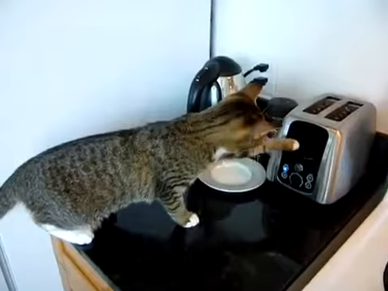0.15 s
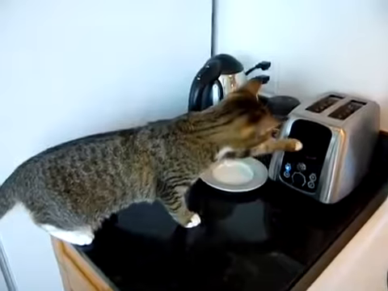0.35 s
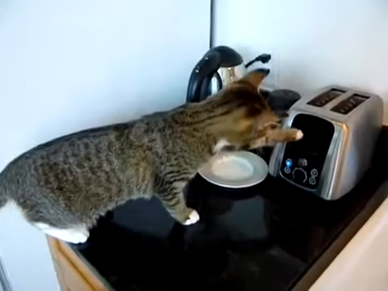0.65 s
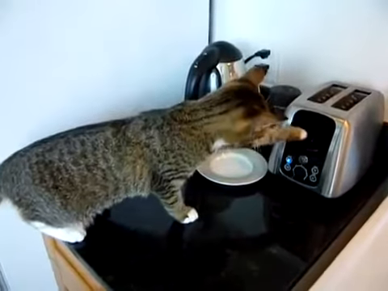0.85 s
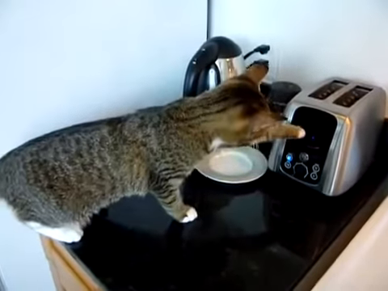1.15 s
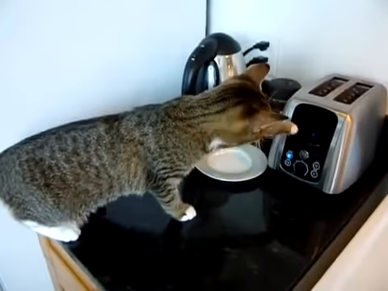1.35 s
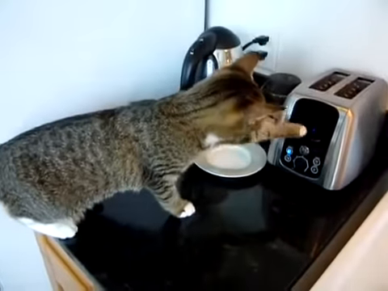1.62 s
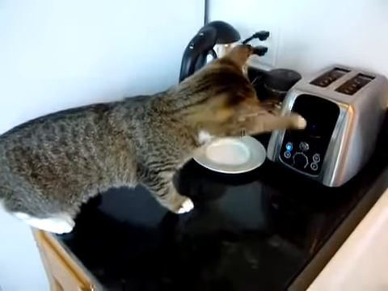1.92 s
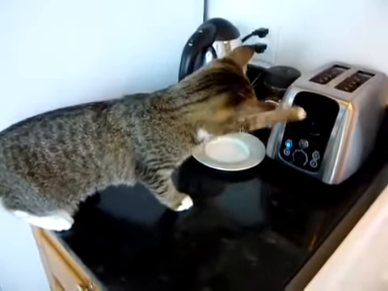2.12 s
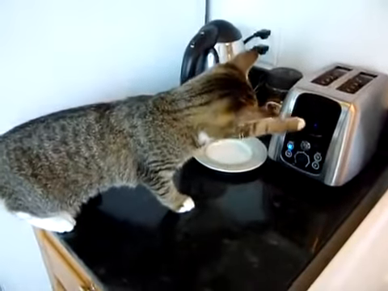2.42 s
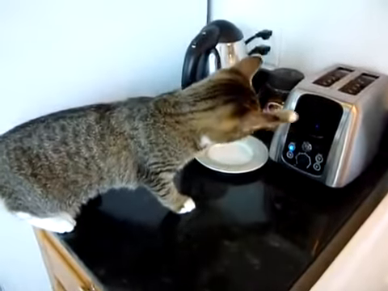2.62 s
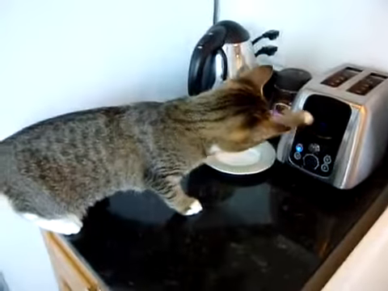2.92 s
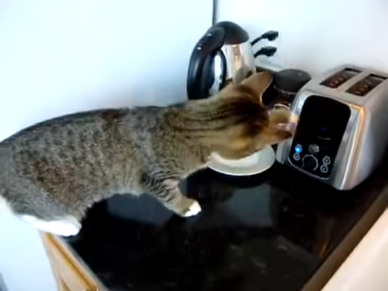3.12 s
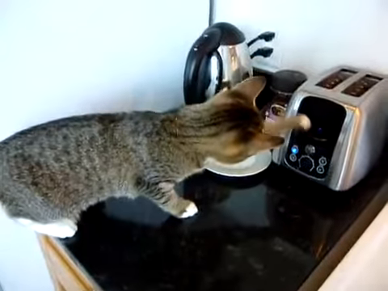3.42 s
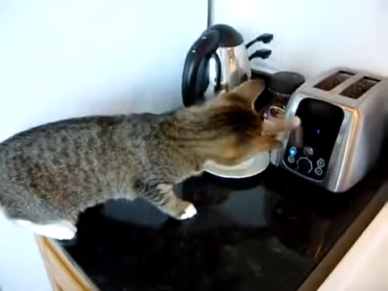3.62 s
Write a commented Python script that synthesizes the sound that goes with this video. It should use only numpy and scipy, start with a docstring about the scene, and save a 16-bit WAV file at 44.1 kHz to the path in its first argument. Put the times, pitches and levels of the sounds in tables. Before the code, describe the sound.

A toaster pops up loudly near the end, clacking, rattling and twanging in metal, after several seconds of quiet appliance drone with faint claw ticks and paw brushes; small kitchen, close microphone, dulled top end.

```python
"""An appliance drones, hums and softly bumps in a small kitchen while a cat paws at a toaster, claws ticking.
The catch lets go with a clack, the spring twangs downwards, the carriage rattles up its guides
and slams into the top stop; the steel case rings and knocks on the worktop.
Drone, fur and claws are shaped noise, the hum and spring are gliding sines,
and the metal is built from decaying sine modes and bursts of coloured noise."""
import sys
import numpy as np
from scipy import signal
from scipy.fft import rfft, irfft, next_fast_len
from scipy.io import wavfile

SR = 44100
rng = np.random.default_rng(int(sys.argv[2]) if len(sys.argv) > 2 else 0)


def master(y):
    """Save y as 16-bit WAV."""
    cut = np.clip(np.atleast_2d(y).T, -1, 1)
    pcm = np.round(cut * 32767)  # scale
    wavfile.write(sys.argv[1], SR, pcm.astype(np.int16))


N = 165816
TIME = np.arange(N) / SR
CONTACT_RISE_S = 0.0013  # attack shared by most of the metal parts


def from_db(db):
    """Decibels to gain."""
    return 10 ** (np.asarray(db) / 20)


def rms_one(x):
    """Scale to an rms of one."""
    return x / np.sqrt(np.mean(x ** 2) + 1e-20)


def noise(gain_at):
    """Noise of rms one whose gain is a function of frequency."""
    size = next_fast_len(N)
    hz = np.maximum(np.arange(size // 2 + 1) * SR / size, 1)
    spectrum = rfft(rng.standard_normal(size)) * gain_at(hz)
    return rms_one(irfft(spectrum, size)[:N])


def coloured(points):
    """Noise of rms one whose spectrum runs through (f/Hz, level/dB) points on a log frequency axis."""
    at, db = np.transpose(points)
    return noise(lambda hz: from_db(np.interp(np.log(hz), np.log(at), db)))


def octave_band(centre, spread):
    """Noise of rms one in a bell-shaped band, its spread in octaves."""
    return noise(lambda hz: np.exp(-.5 * (np.log2(hz / centre) / spread) ** 2))


def resonances(rows):
    """Noise through narrow resonances: unsteady tones."""
    out = np.zeros(N)
    for centre, width, db in rows:
        out += from_db(db) * noise(lambda hz: 1 / (1 + ((hz - centre) / width * 2) ** 2))
    return out


def drift(rate):
    """Slow random movement of rms one, fading out above the rate in Hz."""
    return noise(lambda hz: 1 / (1 + (hz / rate) ** 2))


def swell(middle, length):
    """Smooth bell-shaped envelope with a peak of one."""
    return np.exp(-2 * ((TIME - middle) / length) ** 2)


def swells(rows):
    """Sum of smooth swells from rows of (middle t/s, length/s, level/dB)."""
    return sum(from_db(db) * swell(middle, length) for middle, length, db in rows)


def blow(start, rise, t60):
    """Envelope of a quick rise and an exponential decay."""
    age = np.maximum(TIME - start, 0)
    return (1 - np.exp(-age / rise)) * from_db(-60 * age / t60)


def struck(modes, start, db, rise, scatter_db):
    """One blow sets every mode ringing as a decaying sine, each with a random strength of its own."""
    out = np.zeros(N)
    first = min(int(start * SR), N - 1)
    age = TIME[:N - first]
    for hz, level_db, t60 in modes:
        strength_db = db + level_db + scatter_db * rng.standard_normal()
        out[first:] += from_db(strength_db - 60 * age / t60) * np.sin(2 * np.pi * hz * age)
    out[first:] *= 1 - np.exp(-age / rise)
    return out


def drone():
    """Air noise, with the unsteady tones, swelling whine and fading high singing of a running appliance."""
    # steady air noise of the kitchen: (f/Hz, relative density/dB per Hz)
    air = [(25, -14), (45, -33), (80, -20.5), (140, -5.5), (280, -4), (480, -8.5), (750, -13.5),
           (1050, -15.5), (1400, -19), (2000, -26.5), (3800, -31), (6400, -33), (8100, -41.5), (9300, -55),
           (10200, -74)]
    # movement of the air noise: (t/s, level/dB)
    air_level = [(0, -0.35), (2.35, .5), (2.7, -0.5), (3.6, 0.3)]
    # low resonances of the drone: (f/Hz, width/Hz, rms level/dB)
    drone_tones = [(173.6, 11, -59.5), (230.8, 7.1, -55), (277.4, 24, -51), (345.4, 19, -55),
                   (462.3, 24, -56.5), (649, 12, -60.5), (685.8, 18, -58)]
    # the appliance's whine before its swelling: (f/Hz, width/Hz, rms level/dB)
    whine_tones = [(819.7, 15, -60.5), (916.7, 35, -56), (975, 40, -62.5)]
    # swelling of the whine: (t/s, level/dB)
    whine_level = [(0, -4), (.7, -1.5), (1.5, 1.5), (2.05, 4), (2.75, 4), (2.9, -1.5), (3.15, 3.5),
                   (3.76, -6)]
    # thin high singing: (f/Hz, width/Hz, rms level at the start/dB)
    singing_tones = [(2458, 45, -72), (2590, 50, -69), (2858, 50, -72), (6350, 45, -76)]
    air_mean_db, air_waver_db, singing_fade_db_per_s = -44, .5, 0.5

    whine = from_db(np.interp(TIME, *np.transpose(whine_level))) * resonances(whine_tones)
    singing = from_db(-singing_fade_db_per_s * TIME) * resonances(singing_tones)
    air_db = air_mean_db + np.interp(TIME, *np.transpose(air_level)) + air_waver_db * drift(rate=8.1)
    return resonances(drone_tones) + whine + singing + from_db(air_db) * coloured(air)


def bumps():
    """Soft, deep bumps: swells of low noise."""
    # bumps: (middle t/s, length/s, level/dB)
    bump_swells = [(.1, 0.046, -54), (.245, 0.035, -52), (.41, .03, -58), (.84, 0.17, -56.5),
                   (1.21, .025, -52), (1.55, .035, -53), (1.96, 0.18, -55)]
    return swells(bump_swells) * octave_band(centre=69, spread=0.81)


def hum():
    """The strongest note of the drone: a sine that wanders in pitch and surges now and then."""
    # surges of the hum: (middle t/s, length/s, peak level/dB)
    surges = [(.133, 0.032, -38.5), (.357, 0.047, -38), (.628, 0.026, -39.5), (1.083, 0.023, -38),
              (1.9, .04, -38), (2.14, 0.089, -38), (3.114, 0.032, -37.5), (3.289, 0.038, -39),
              (3.52, 0.075, -40)]
    centre_hz, wander_hz = 279.3, 9.24
    hz = centre_hz + wander_hz * drift(rate=25.4)
    return swells(surges) * np.sin(2 * np.pi * np.cumsum(hz) / SR)


def claws():
    """Tiny dry ticks of claws on the toaster: short bursts of banded noise."""
    # claw ticks: (t/s, level/dB, centre f/Hz)
    ticks = [(.207, -54, 7500), (.839, -58, 7500), (1.318, -60, 7500), (1.408, -58, 7000),
             (1.477, -56, 3500), (1.569, -56, 6500), (1.647, -55, 4000), (1.782, -57, 6500),
             (1.847, -57, 4500), (1.934, -57, 3000), (2.011, -57, 6000), (2.131, -57, 7620),
             (2.531, -53, 6000), (3.058, -55, 2980), (3.109, -59, 2500), (3.13, -60, 6500),
             (3.185, -50.5, 3000), (3.345, -57, 5000), (3.418, -57, 4500), (3.547, -58, 4000)]
    rise_s, t60_s = .0005, .05
    out = np.zeros(N)
    for start, db, centre in ticks:
        out += from_db(db) * blow(start, rise_s, t60_s) * octave_band(centre, spread=0.65)
    soften = signal.butter(8, 8000, fs=SR, output="sos")
    return signal.sosfilt(soften, out)


def cat():
    """Paw and fur brush the toaster: soft, grainy swells of friction noise."""
    # brushes: (middle t/s, length/s, level/dB, centre f/Hz, spread/octaves)
    brushes = [(.34, .03, -60, 2000, 0.43), (0.858, 0.03, -62, 5000, 0.69), (0.96, 0.032, -58, 1900, 0.62),
               (1.2, 0.044, -61, 3000, 0.69), (1.524, 0.1, -55, 1630, 0.48),
               (1.558, 0.14, -62.5, 5270, 0.26), (1.675, 0.07, -55.5, 1600, 0.56),
               (1.675, .045, -61, 5200, .2), (1.812, 0.064, -55.5, 1600, 0.64),
               (1.82, 0.066, -59.5, 5200, 0.22), (1.947, 0.027, -55.5, 3260, 0.47),
               (3.074, 0.12, -57, 2440, 0.87), (3.204, 0.045, -65, 4000, 0.64),
               (3.35, 0.036, -59, 4100, 0.092), (3.337, 0.21, -61.5, 2580, .6),
               (3.428, 0.053, -58, 4370, 0.53), (3.55, 0.094, -62.5, 3970, 0.75)]
    grain_db = 2.5
    out = np.zeros(N)
    for middle, length, db, centre, spread in brushes:
        out += from_db(db) * octave_band(centre, spread) * swell(middle, length)
    grainy = out * from_db(grain_db * drift(rate=110))
    soften = signal.butter(8, 7500, fs=SR, output="sos")
    return signal.sosfilt(soften, grainy)


def guides(start, db, pitch):
    """Where the carriage touches decides which modes of the wires ring most, and detunes them a little."""
    # modes of the wire guides: (f/Hz, level/dB, t60/s)
    wire_modes = [(3330, -5.5, 0.093), (4090, -3, 0.061), (4030, -5.5, 0.17), (4110, -4, 0.26),
                  (4210, -11, 0.075), (4280, -3, 0.08), (4480, -9, 0.059), (4530, -4.5, 0.08),
                  (4630, -8, 0.057), (4750, -14, .09), (5470, -9.5, 0.089), (6180, -6.5, 0.1),
                  (6220, -12.5, .09), (6870, -10, 0.29), (7080, -20, 0.19)]
    focus_octaves, far_db, scatter_db = 0.15, -13.5, -2
    detune = 0.0058  # share of a mode's pitch
    out = np.zeros(N)
    for hz, level_db, t60 in wire_modes:
        distance = np.log2(hz / pitch) / focus_octaves
        touched_db = level_db + far_db * (1 - np.exp(-distance ** 2))
        mode = (hz * (1 + detune * rng.standard_normal()), touched_db, t60)
        # the modes start slightly apart
        mode_start = start + CONTACT_RISE_S * rng.random()
        out += struck([mode], mode_start, db, CONTACT_RISE_S, scatter_db)
    return out


def clatter(hits, t60):
    """Envelope of overlapping (t/s, level/dB) blows, added by power as for unrelated noises."""
    power = sum((from_db(db) * blow(start, CONTACT_RISE_S, t60)) ** 2 for start, db in hits)
    return np.sqrt(power)


def carriage():
    """Every contact gives a hard snap, a clack of sheet steel, a bright crack and a ring of the wire guides."""
    # contacts of catch and carriage:
    # (t/s, case clack level/dB, bright crack level/dB, guide ring level/dB, pitch that rings most f/Hz)
    contacts = [(3.6472, -29, -47, -46, 4000), (3.65, -14.5, -36, -18, 4590),
                (3.6639, -25, -24, -18.5, 4380), (3.6745, -19, -23.5, -17, 3800),
                (3.6935, -28, -20, -32, 4070), (3.7009, -29, -17, -22, 4240), (3.707, -21, -27, -40, 4100),
                (3.7211, -21.5, -22.5, -23.5, 4200), (3.7345, -26, -22.5, -20, 6200),
                (3.7444, -24.5, -30, -18, 3800)]
    # damped modes of the snap, relative to the clack: (f/Hz, level/dB, t60/s)
    snap_modes = [(1290, 2, 0.015), (1780, -3, 0.011), (2390, -2.5, 0.008)]
    # dense ring of the case: (f/Hz, relative density/dB per Hz)
    clack_colour = [(40, -18), (100, -9), (300, -10), (560, 2.5), (780, -4.5), (1030, 4.5), (1300, 2),
                    (1750, -0.5), (2050, -1), (2350, 2.5), (3100, -7.5), (4500, -2), (7000, -15),
                    (10000, -39)]
    # dense ring of the crack: (f/Hz, relative density/dB per Hz)
    crack_colour = [(500, -7.5), (2000, -17), (3300, -6.5), (3700, -5.5), (4700, -3), (5550, -5),
                    (6100, -4), (6750, -5.5), (7600, -17.5), (8400, -20.5), (9100, -19), (9700, -32),
                    (10500, -50)]
    snap_rise_s, clack_t60_s, crack_t60_s = .0001, 0.088, 0.073

    snap = sum(struck(snap_modes, s, db, snap_rise_s, scatter_db=1.5) for s, db, _, _, _ in contacts)
    clack = clatter([(s, db) for s, db, _, _, _ in contacts], clack_t60_s) * coloured(clack_colour)
    crack = clatter([(s, db) for s, _, db, _, _ in contacts], crack_t60_s) * coloured(crack_colour)
    ring = sum(guides(s, db, pitch) for s, _, _, db, pitch in contacts)
    return snap + clack + crack + ring


def case():
    """The jolts rock the hollow case on its rubber feet, ring its panels and thud into the worktop."""
    # knocks: (t/s, hollow knock level/dB, its pitch f/Hz, panel ring level/dB, worktop thud level/dB)
    knocks = [(3.6505, -11, 519, -25, -46), (3.6644, -12.5, 483, -26, -22.5), (3.676, -42, 490, -22, -30),
              (3.705, -27, 447, -22.5, -42), (3.7165, -12, 474, -44, -35), (3.7288, -21, 454, -30, -21),
              (3.7419, -19, 470, -30, -24)]
    # modes of the case's panels: (f/Hz, level/dB, t60/s)
    panel_modes = [(640.5, -7, 0.15), (1007, -4, 0.081), (1086, -6, 0.09), (1258, -5, 0.076),
                   (1294, -4, 0.059), (1730, -2, 0.051), (2340, -5, .1), (2440, -19, 0.068),
                   (3054, -11, 0.089)]
    # modes of the worktop: (f/Hz, level/dB, t60/s)
    worktop_modes = [(178.6, -4.5, 0.12), (260, -8.5, 0.16), (324, 1, 0.074)]
    knock_rise_s, hollow_t60_s = 0.0027, 0.045
    out = np.zeros(N)
    for start, hollow_db, hollow_hz, panel_db, thud_db in knocks:
        hollow_mode = (hollow_hz, 0, hollow_t60_s)
        out += struck([hollow_mode], start, hollow_db, knock_rise_s, scatter_db=-1.0)
        out += struck(panel_modes, start, panel_db, CONTACT_RISE_S, scatter_db=0.5)
        out += struck(worktop_modes, start, thud_db, knock_rise_s, scatter_db=3.5)
    return out


def spring():
    """High waves run along the coil faster than low ones, so each jolt arrives as a falling chirp."""
    # twangs: (t/s, starting f/Hz, level/dB, glide time to half the pitch/s)
    twangs = [(3.652, 1950, -29.5, .15), (3.669, 1418, -22, 0.052), (3.683, 1846, -28, 0.046),
              (3.704, 1830, -19, .056)]
    t60_s, roughness = 0.12, .15
    out = np.zeros(N)
    for start, top_hz, db, glide in twangs:
        hz = top_hz / (1 + np.maximum(TIME - start, 0) / glide)
        chirp = np.sin(2 * np.pi * np.cumsum(hz) / SR)
        out += from_db(db) * blow(start, CONTACT_RISE_S, t60_s) * chirp
    return out * (1 + roughness * drift(rate=310))


def top_stop():
    """The carriage slams home and the modes of the steel frame clink."""
    # modes of the frame: (f/Hz, level/dB, t60/s)
    frame_modes = [(3250, -17, 0.11), (3460, -18.5, 0.17), (4030, -13, 0.13), (4115, -14, 0.21),
                   (4670, 1, 0.041), (4800, -10, 0.027), (5300, -4, .035), (6100, -15, 0.067),
                   (6530, -9, .055), (6640, -15, .11)]
    return struck(frame_modes, start=3.7032, db=-10, rise=0.00071, scatter_db=-1.0)


def kitchen(x):
    """Dense reflections from tiles and cupboards: a decaying noise tail of unit energy."""
    delay_s, t60_s = 0.0136, 0.13
    tail = (rng.standard_normal(N) * blow(delay_s, CONTACT_RISE_S, t60_s))[:SR // 2]
    return signal.fftconvolve(x, tail / np.sqrt(np.sum(tail ** 2)))[:N]


def scene():
    """The toaster and its reflections over the drone and the cat."""
    room_db = -11
    toaster = carriage() + top_stop() + case() + spring()
    background = drone() + hum() + bumps() + cat() + claws()
    return (toaster + from_db(room_db) * kitchen(toaster) + background)[None]


def record(dry):
    """The loudest peaks are rounded, the top is cut, and the signal rides on a constant bias."""
    ceiling, bias, cutoff_hz = .85, -0.059, 10200
    rounded = ceiling * np.tanh(dry / ceiling)
    # the stopband, 60 dB down, starts just above the cutoff
    top_cut = signal.cheby2(14, 60, cutoff_hz * 1.08, fs=SR, output="sos")
    return bias + signal.sosfilt(top_cut, rounded)


dry = scene()
out = record(dry)
master(out)
```